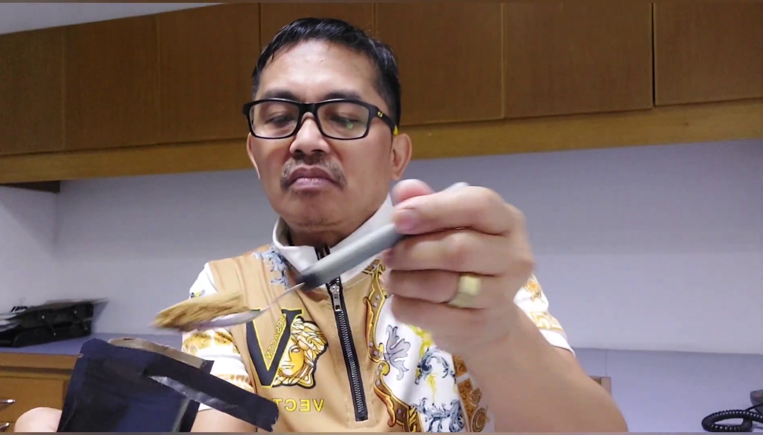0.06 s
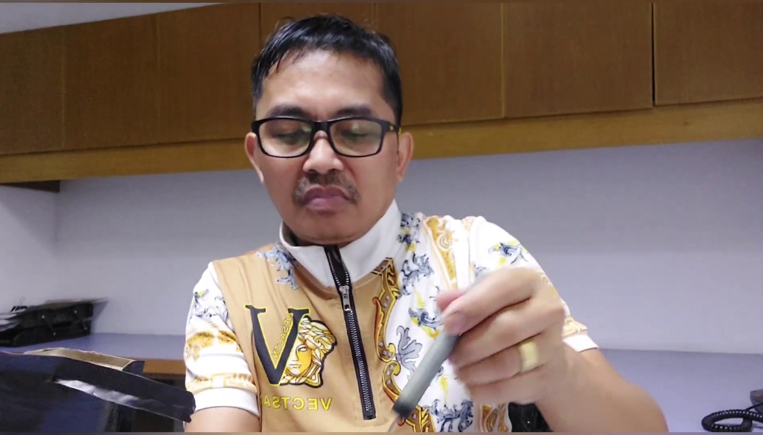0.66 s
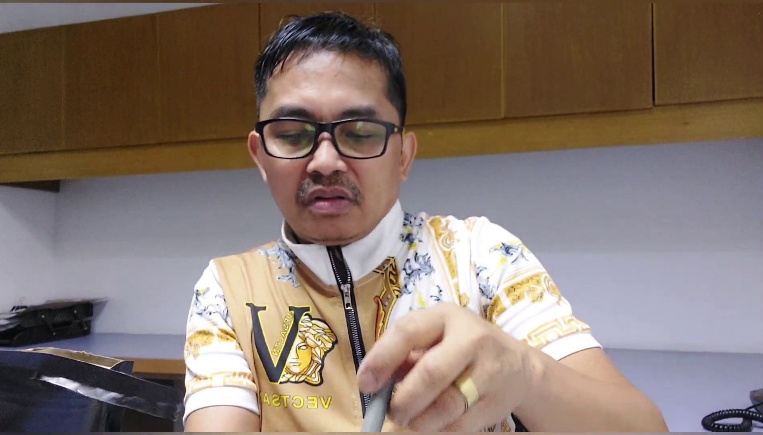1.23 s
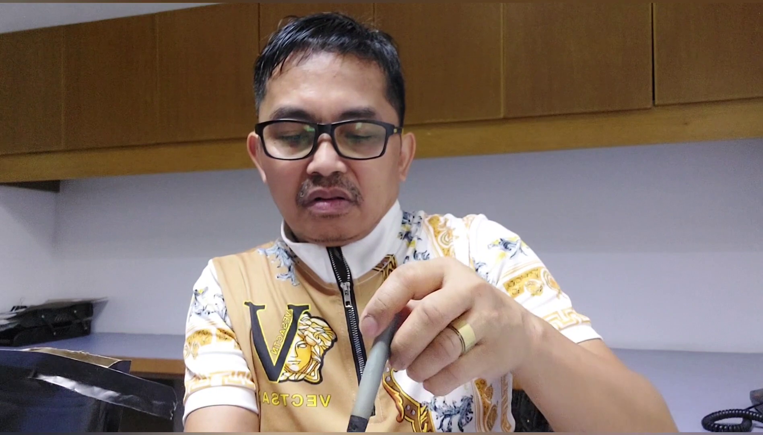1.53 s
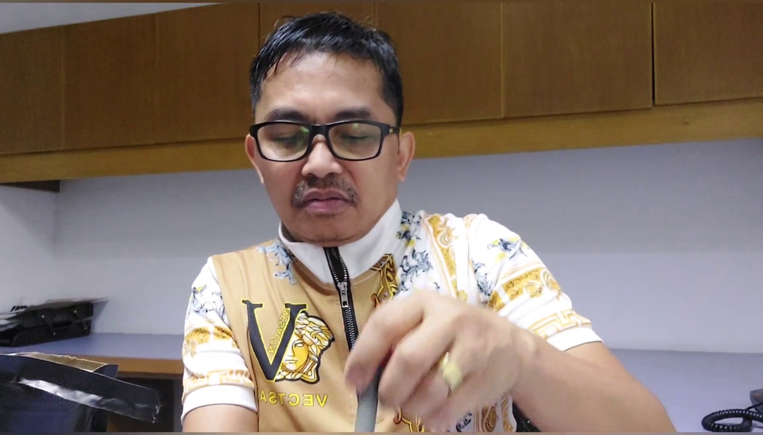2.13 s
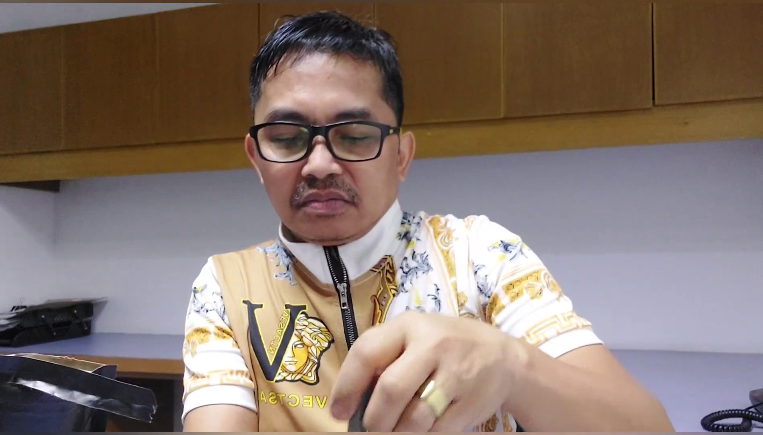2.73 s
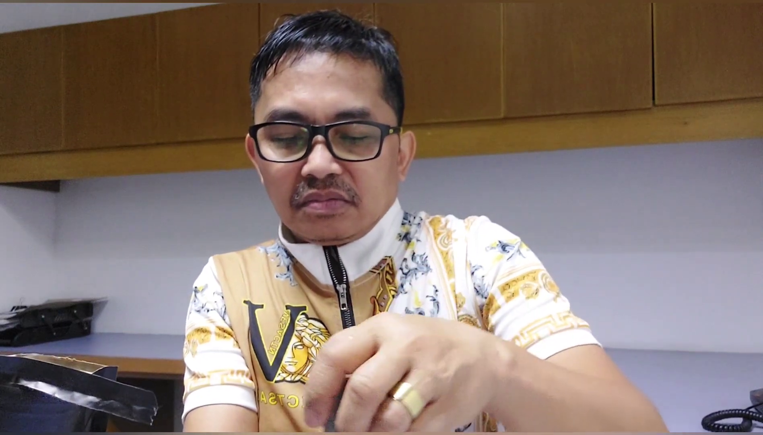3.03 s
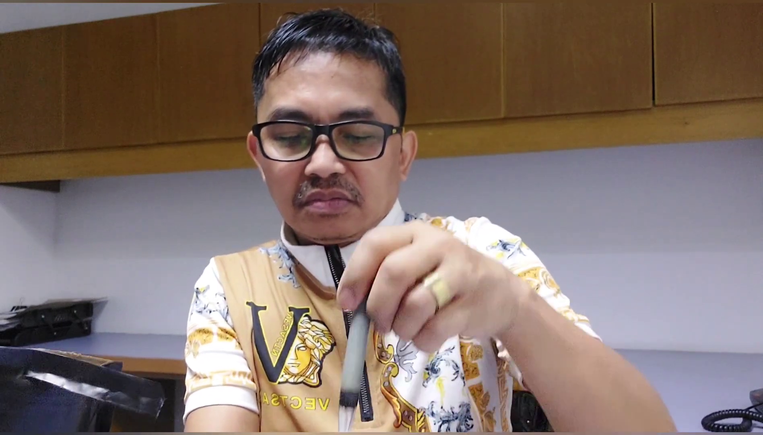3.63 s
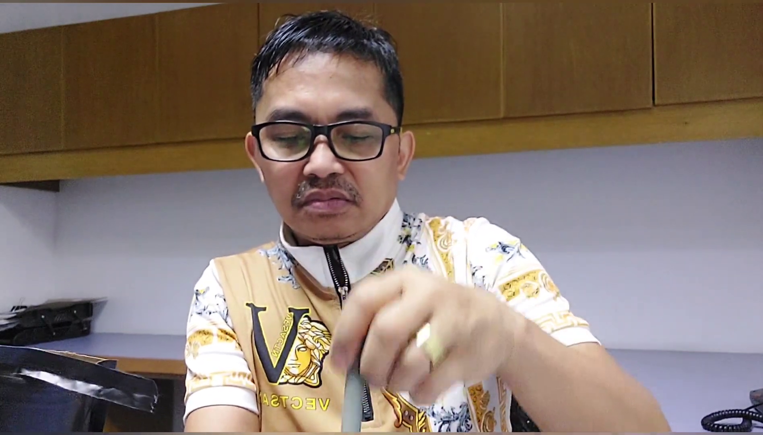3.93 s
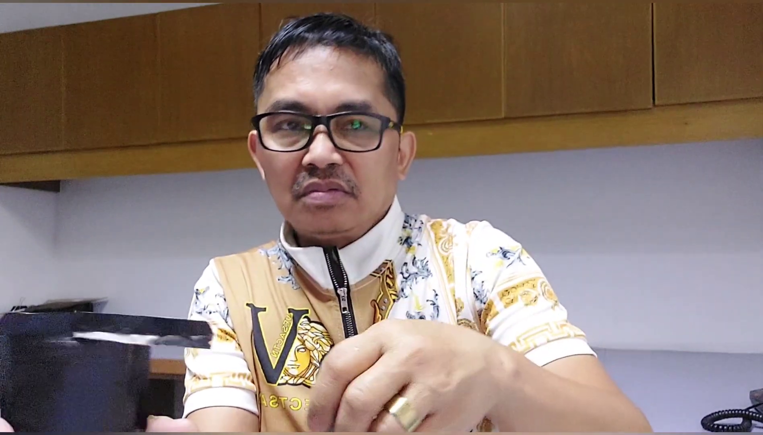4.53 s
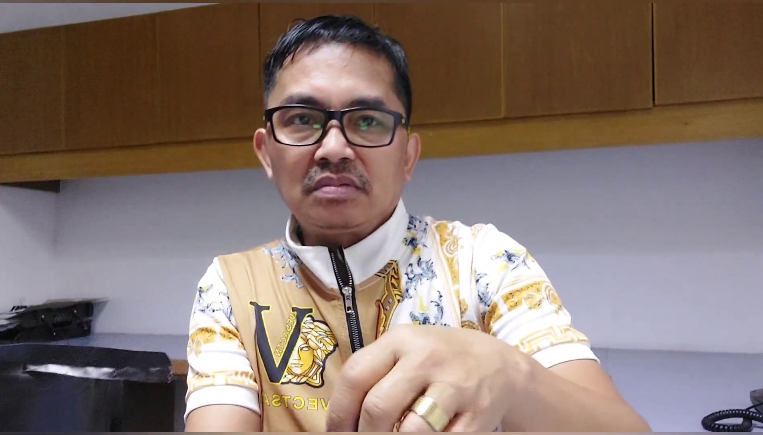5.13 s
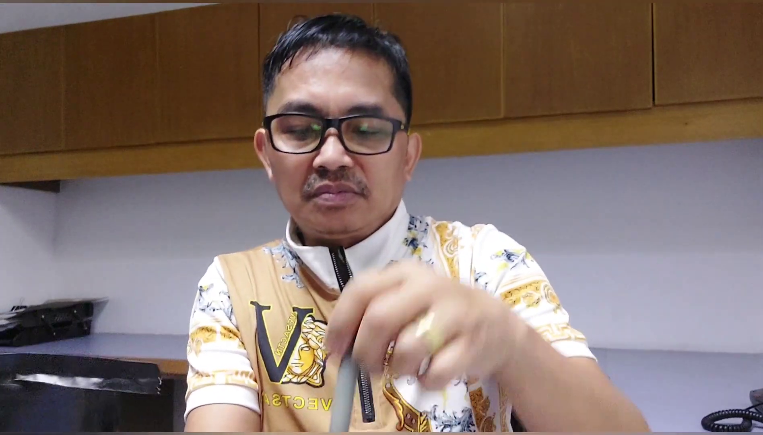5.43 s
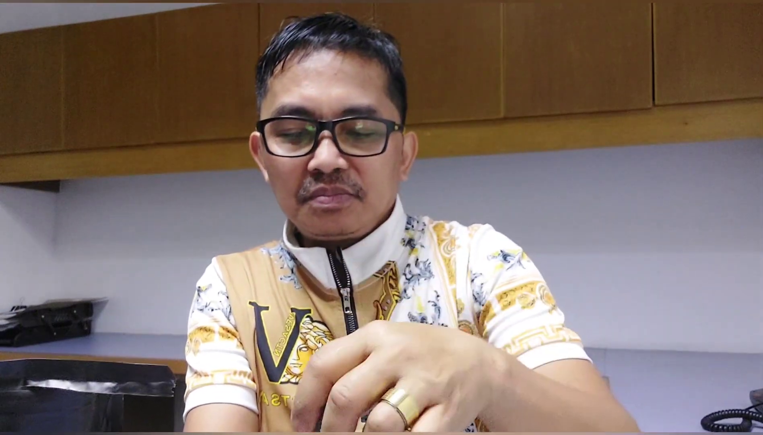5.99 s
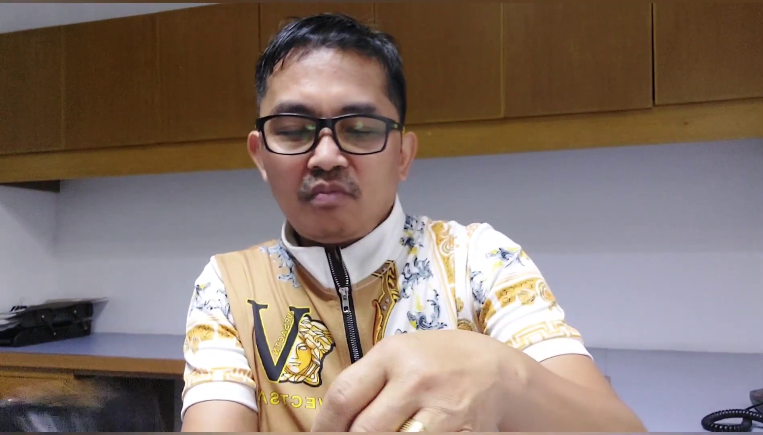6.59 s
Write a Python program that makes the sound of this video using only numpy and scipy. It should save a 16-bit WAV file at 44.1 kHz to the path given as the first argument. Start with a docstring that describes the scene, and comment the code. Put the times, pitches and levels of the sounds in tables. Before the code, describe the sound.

Ventilation hums steadily in a small office, and a desk takes a soft, low bump. Close to the microphone, a metal spoon stirs faintly in a cup, then clinks against it about a dozen times in uneven clusters. Each clink rings briefly and thuds into the desk, some trailing into a short scrape. Two dull knocks and more bumps come in the second half, and a faint, thin swish rises at the end.

```python
"""Ventilation hums steadily in a small office, and a desk takes a soft, low bump.
Close to the microphone, a metal spoon stirs faintly in a cup, then clinks round it a dozen times.
Each clink ticks, rings the cup and the hand-damped spoon, and thuds into the desk; some run on as
a short scrape. More bumps and two dull knocks come from the desk, and a thin swish rises at the end."""
import sys
import numpy as np
from scipy import signal
from scipy.fft import rfft, irfft
from scipy.io import wavfile
from scipy.ndimage import uniform_filter1d

SR = 44100
rng = np.random.default_rng(int(sys.argv[2]) if len(sys.argv) > 2 else 0)


def log_audio(samples):
    """Write samples as a 16-bit WAV file to the path given in sys.argv[1]."""
    # one column per channel
    frames = np.atleast_2d(samples).T
    # limit to full scale, then quantise
    limited = np.clip(frames, -1, 1)
    pcm = np.round(limited * 32767).astype(np.int16)
    wavfile.write(sys.argv[1], SR, pcm)


N = 297787
RING_N = int(.4 * SR)  # samples in one short sound
RING_T = np.arange(RING_N) / SR

# The spoon's blows on the cup: t/s, force/dB, how flat/0-1, how sideways/0-1, # where round the wall/0-1, drag
# afterwards/s
BLOWS = [(1.9383, -56.5, 0.23, 0.2, 0.63, 0.011), (2.984, -49, 0.07, .3, 0.82, 0.011),
         (3.089, -48, 1, 0, 0.65, 0.0038), (3.159, -59, 0.88, 0.33, 1, .079), (4.27, -51, 0, 0.1, 0, 0.014),
         (4.699, -62.5, 0.24, 0.47, 0.77, 0.0069), (4.785, -46, .15, 0.38, 0.23, 0.041),
         (4.9688, -55, 0.66, 0.83, 0.68, 0), (4.9946, -54.5, 0.57, 0, 1, .049),
         (5.1123, -52.5, 0.56, 0.32, 0.7, 0.11), (6.0563, -46, 0.1, 0.31, 0.67, 0.0096),
         (6.1826, -49.5, 0.76, 0.38, 0.18, 0.063)]
# The tones of the cup's wall, in close pairs: f/Hz, ring time/s, level/dB
CUP_TONES = [(1900, 0.19, -1), (1988, 0.1, 3), (3356, 0.2, 3), (3470, 0.085, -24), (4350, 0.14, -2.5),
             (5200, 0.086, -8), (5400, 0.13, -1.5), (6760, .09, -8.5), (6960, 0.16, -7), (8200, 0.13, -14)]
# The spectrum of the tick where spoon meets cup: f/Hz, level/dB
TICK_SPECTRUM = [(500, -1), (1000, -17.5), (2300, -8.5), (3100, 1.5), (3750, -6), (4400, 0), (5800, -5),
                 (7400, 0.5), (9800, -3), (12000, -0.5), (13500, -5.5), (16000, -10.5)]


def gain(db):
    """Turn decibels into a number to multiply by."""
    return 10 ** (np.asarray(db) / 20)


def unit(x):
    """Scale a sound to an average (rms) level of 1."""
    return x / np.sqrt(np.mean(x ** 2))


def add(out, start_s, sound):
    """Mix a stereo sound in at its start time."""
    i = int(start_s * SR)
    out[:, i:i + sound.shape[1]] += sound[:, :N - i]


def pan(left_db):
    """Two gains that make the left side left_db louder than the right."""
    return gain(np.array([[left_db], [-left_db]]) / 2)


def noise(points, size=RING_N):
    """Noise whose spectrum follows points of f/Hz, level/dB."""
    hz, db = np.transpose(points)
    f = np.maximum(np.fft.rfftfreq(size, 1 / SR), 1)
    shape = gain(np.interp(np.log(f), np.log(hz), db))
    return unit(irfft(rfft(rng.standard_normal(size)) * shape, size))


def band(hz, width_hz, size=RING_N):
    """Noise gathered round one pitch."""
    f = np.maximum(np.fft.rfftfreq(size, 1 / SR), .1)
    off_pitch = (f * f - hz * hz) / (f * width_hz)
    return unit(irfft(rfft(rng.standard_normal(size)) / (1 + off_pitch ** 2), size))


def swell(peak_s):
    """A push that grows until peak_s and dies away."""
    return RING_T / peak_s * np.exp(-RING_T / peak_s)


def fade(ring_s):
    """A level that falls by 60 dB in the ring time."""
    return np.exp(-np.log(1000) * RING_T / ring_s)


def ring(tones, build_s=0.0014, scatter_db=2):
    """Tones build up as a blow spreads; the spot that is hit favours different ones each time."""
    sound = np.zeros(RING_N)
    for hz, ring_s, db in tones:
        strength = gain(db + scatter_db * rng.standard_normal())
        sound += strength * fade(ring_s) * np.sin(2 * np.pi * hz * RING_T)
    return sound * (1 - np.exp(-RING_T / build_s))


def office(early_db=-4, early_s=.045, tail_db=-4.5, tail_s=0.21, walls_delay_s=.015):
    """The room's answer to a click: direct sound, quick echoes off desk and body, then a short tail."""
    early = fade(early_s) * (RING_T > .0005)
    tail = fade(tail_s) * (1 - np.exp(-(RING_T / walls_delay_s) ** 2))
    early *= gain(early_db) / np.linalg.norm(early)
    tail *= gain(tail_db) / np.linalg.norm(tail)
    room = np.hypot(early, tail) * rng.standard_normal((2, RING_N))
    # low sounds reach both microphones alike
    room[1] += signal.sosfilt(signal.butter(1, 350, fs=SR, output="sos"), room[0] - room[1])
    # the direct sound meets the left microphone first
    room[0, 0] += 1
    room[1, 4] += 1
    return room


def heard(sound, room, db):
    """Carry a sound through the room and set its loudest 25 ms to db."""
    stereo = signal.fftconvolve(sound[None], room, axes=1)
    power = uniform_filter1d(np.mean(stereo ** 2, axis=0), int(.025 * SR))
    return stereo * gain(db) / np.sqrt(power.max())


def ventilation(shared_db=-52, side_db=-60.5, waver=0.99, waver_hz=10, lean_left=.28):
    """Moving air rumbles and a motor's hum wavers; the middle pitches come more from the left."""
    # The air noise that both sides share: f/Hz, level/dB
    shared_spectrum = [(12, -58), (20, -32.5), (34, -27.5), (44, -9), (107, -5), (182, -6), (228, -2.5),
                       (262, -11), (434, -16.5), (590, -27), (718, -28.5), (1030, -40), (1710, -43.5),
                       (3340, -54), (16000, -55)]
    # The air noise that differs between the sides: f/Hz, level/dB
    side_spectrum = [(12, -43), (20, -22), (60, 3.5), (91, -8), (120, 2), (182, -5.5), (241, 3), (277, -4),
                     (357, -2.5), (410, -11.5), (660, -16), (1400, -27.5), (3440, -39.5), (14700, -40.5),
                     (16000, -29.5)]
    # The motor's tones: f/Hz, level/dB
    motor_tones = [(118.4, -61), (239, -66)]
    t, hum = np.arange(N) / SR, np.zeros(N)
    for hz, db in motor_tones:
        wobble = 1 + waver * band(0, waver_hz, N)
        hum += gain(db) * np.sqrt(2) * wobble * np.sin(2 * np.pi * hz * t)
    shared = gain(shared_db) * noise(shared_spectrum, N) + hum
    side = gain(side_db) * noise(side_spectrum, N)
    air = np.array([shared + side, shared - side])
    middle = signal.sosfiltfilt(signal.butter(2, [330, 1300], "band", fs=SR, output="sos"), air)
    return pan(left_db=0.2) * air + lean_left * np.array([[1], [-1]]) * middle


def soft_contacts(events, width_share):
    """Each soft contact is a swell of noise round one pitch; its width is a share of that pitch."""
    out = np.zeros((2, N))
    for start_s, db, hz, peak_s in events:
        add(out, start_s, heard(swell(peak_s) * band(hz, width_share * hz), office(), db))
    return out


def bumps():
    """The desk takes a few soft, low bumps."""
    # Bumps on the desk: t/s, level/dB, f/Hz, swell time/s
    desk_bumps = [(.785, -46, 118, 0.015), (2.72, -46, 122, 0.031), (4.988, -34.5, 112, 0.022),
                  (5.13, -46.5, 190.5, 0.09), (5.31, -45.5, 116.5, 0.064), (6.65, -40.5, 130, 0.014)]
    return soft_contacts(desk_bumps, width_share=.42)


def stirs():
    """The spoon stirs faintly in the cup, and the drink plops now and then."""
    # Small sounds in the cup, spoon moves and plops of the drink: t/s, level/dB, f/Hz, swell time/s
    cup_sounds = [(1.27, -73, 1170, 0.013), (1.82, -64.5, 2420, 0.0027), (4.06, -77, 4370, 0.013),
                  (4.55, -70, 1470, 0.0075), (6.39, -75, 2450, 0.022), (6.472, -74.5, 4000, 0.012)]
    return soft_contacts(cup_sounds, width_share=0.26)


def touches(fizz_db=-1, tick_db=-6, peak_s=0.0014):
    """The spoon's tip barely touches: just the top of its ring, a little fizz and a weak tick."""
    # Touches of the tip: t/s, level/dB
    tip_touches = [(1.371, -60), (1.836, -74), (2.68, -71), (5.48, -75), (6.528, -70.5)]
    out = np.zeros((2, N))
    for start_s, db in tip_touches:
        high_ring = band(hz=8200, width_hz=1400)
        fizz = gain(fizz_db) * band(hz=12500, width_hz=5000)
        tick = gain(tick_db) * noise(TICK_SPECTRUM)
        add(out, start_s, heard(swell(peak_s) * (high_ring + fizz + tick), office(), db))
    return out


def clinks(tick_db=4, low_db=5.5, upper_db=-10, place_db=16.5, thud_db=10.5, full_force_db=-44):
    """Each blow ticks, rings cup and spoon, thuds into the desk and clacks; harder is louder."""
    out = np.zeros((2, N))
    for start_s, force_db, *contact, _ in BLOWS:
        flat, side, place = np.clip(contact, 0, 1)
        room = office()
        # a flat landing makes the tick louder and the cup's low tones softer
        flat_tick_db, flat_cup_db = 4.5 * flat, -1 * flat
        tick = noise(TICK_SPECTRUM) * swell(peak_s=0.0012)
        add(out, start_s, pan(left_db=-2) * heard(tick, room, force_db + tick_db + flat_tick_db))
        # at some places round the wall, the cup's upper tones ring more freely
        wall = cup(room, force_db + low_db + flat_cup_db, force_db + upper_db + place_db * place, flat, place)
        add(out, start_s, wall)
        add(out, start_s, thud(force_db + thud_db))
        for hz, ring_s, db in spoon_tones(flat, side):
            buzz = chatter(ring([(hz, ring_s, db)], build_s=0.00059))
            add(out, start_s, pan(left_db=4.5) * heard(buzz, room, force_db + db))
        # the handle clacks clearly only near full force, most of all sideways on the spoon's edge
        clack = band(hz=2400, width_hz=550) * swell(peak_s=0.0031)
        clack_db = force_db - full_force_db - 8 + 13.5 * side - 4.5 * flat
        add(out, start_s, heard(clack, room, force_db + clack_db))
    return out


def cup(room, low_db, upper_db, flat=0., place=0.46, slosh=.004, flat_damping=0.34):
    """The cup's wall rings; the moving drink shifts its tones, and a flat spoon cuts them short."""
    tuning = 1 + slosh * rng.standard_normal(len(CUP_TONES))
    shorten = 1 - flat_damping * flat
    tones = [(hz * shift, ring_s * shorten, db) for (hz, ring_s, db), shift in zip(CUP_TONES, tuning)]
    tilt_db = 9 * (place - .5)  # blows at one side of the wall favour the higher of the two low tones
    low_pair = [(hz, ring_s, db + sign * tilt_db) for (hz, ring_s, db), sign in zip(tones, (-1, 1))]
    return heard(ring(low_pair), room, low_db) + heard(ring(tones[2:]), room, upper_db)


def thud(db, muffle_hz=750):
    """The desk top takes a blow through the cup's foot, which softens it."""
    # The tones of the desk top: f/Hz, ring time/s, level/dB
    desk_tones = [(119, .07, -14.5), (190.4, 0.11, -2.5), (236.3, 0.055, 8), (344.4, 0.099, 2),
                  (451, 0.061, -2.5), (527.5, 0.053, -9), (672, 0.033, -13.5)]
    muffled = signal.sosfilt(signal.butter(2, muffle_hz, fs=SR, output="sos"), ring(desk_tones))
    return pan(left_db=3) * heard(muffled, office(), db)


def spoon_tones(flat, side, flat_pitch_drop=0.017):
    """The way the spoon lands sets how loud and how high its tones are."""
    # The spoon's tones, damped by the fingers: f/Hz, ring time/s, level/dB,
    # change when flat/dB, change when sideways/dB
    held_tones = [(1313, .025, -25, 24, -8), (1602, 0.01, -21, 28.5, -3.5), (5154, 0.011, 3, 12.5, 7),
                  (6697, 0.02, 1, 4, 22), (8295, 0.0066, 0.5, 4, 5.5)]
    return [(hz * (1 - flat_pitch_drop * flat), ring_s, db + flat * flat_db + side * side_db)
            for hz, ring_s, db, flat_db, side_db in held_tones]


def chatter(sound, peak_s=0.00066):
    """Hard surfaces buzz against each other for a moment before they part."""
    force = swell(peak_s) * rng.standard_normal(RING_N)
    return signal.fftconvolve(sound, force)[:len(sound)]


def scrapes(delay_s=.021, slips_per_s=900, uneven_db=4, cup_db=-9, spoon_db=-3, grit_db=-2):
    """The dragged spoon makes many tiny, uneven slips that ring cup and spoon and hiss like grit."""
    out = np.zeros((2, N))
    for blow_s, _, flat, side, _, drag_s in BLOWS:
        if drag_s < delay_s / 2:
            continue
        start_s, size, room = blow_s + delay_s, int(drag_s * SR), office()
        db = -55.5 + 10 * np.log10(drag_s / 0.073)  # longer drags are louder
        slips = (rng.random(size) < slips_per_s / SR) * rng.choice([-1, 1], size)
        slips = slips * gain(uneven_db * rng.standard_normal(size))
        slips *= signal.windows.tukey(size, .3)  # ease in and out
        grit = noise(TICK_SPECTRUM) * fade(ring_s=0.0078)
        wall, spoon = ring(CUP_TONES), ring(spoon_tones(flat, side))
        for part, part_db in (wall, cup_db), (spoon, spoon_db), (grit, grit_db):
            add(out, start_s, heard(signal.fftconvolve(slips, part), room, db + part_db))
        # the cup's hollow answers halfway through, and its wall rings as the spoon leaves
        hollow = swell(peak_s=0.023) * band(hz=830, width_hz=430)
        add(out, start_s + drag_s / 2, heard(hollow, room, db - 6))
        add(out, start_s + drag_s, cup(room, low_db=db - 3, upper_db=db - 12, flat=flat))
    return out


def knocks():
    """Dull blows on the desk faintly shake the cup."""
    # Knocks on the desk: t/s, level/dB
    desk_knocks = [(4.997, -34.5), (6.5292, -32)]
    out = np.zeros((2, N))
    for start_s, db in desk_knocks:
        add(out, start_s, thud(db) + cup(office(), low_db=db - 34, upper_db=db - 50))
    return out


def swish(start_s=6.65, from_hz=7400, rise_hz_per_s=32000, upper_ratio=1.24, swell_s=0.06, db=-69.5):
    """Two thin bands of hiss swell and glide upward together."""
    phase = 2 * np.pi * np.cumsum(from_hz + rise_hz_per_s * RING_T) / SR
    hiss = np.zeros((2, RING_N))
    for channel in hiss:
        for ratio in 1, upper_ratio:
            channel += band(0, width_hz=1100) * np.sin(ratio * phase)
    out = np.zeros((2, N))
    add(out, start_s, hiss * gain(db) * np.minimum(RING_T / swell_s, 1))
    return out


def scene():
    """Spoon, cup and desk over the hum of the ventilation."""
    soft_sounds = bumps() + stirs() + touches() + swish()
    return ventilation() + clinks() + scrapes() + knocks() + soft_sounds


def record(dry, low_cut_hz=42, high_cut_hz=15800):
    """The microphone drops the deepest bass and the recorder cuts the highest treble."""
    thinned = signal.sosfilt(signal.butter(2, low_cut_hz, "high", fs=SR, output="sos"), dry)
    return signal.sosfilt(signal.ellip(10, .2, 70, high_cut_hz, fs=SR, output="sos"), thinned)


dry = scene()
out = record(dry)
log_audio(out)
```